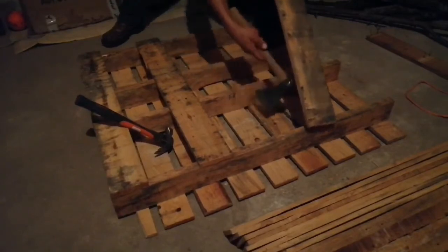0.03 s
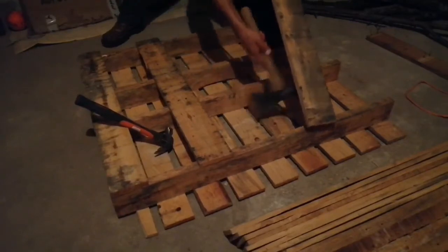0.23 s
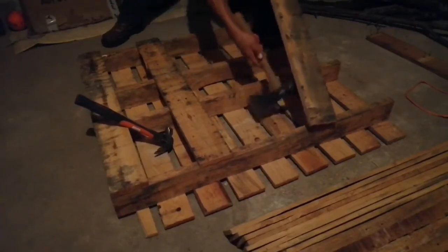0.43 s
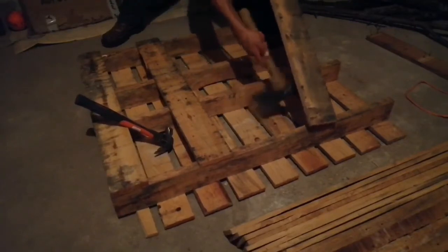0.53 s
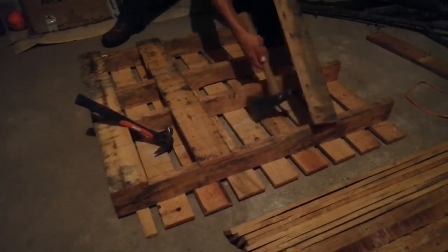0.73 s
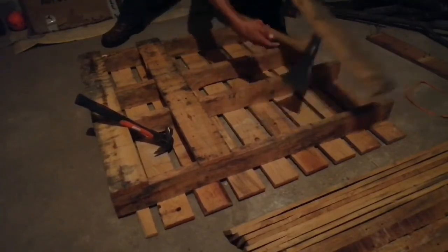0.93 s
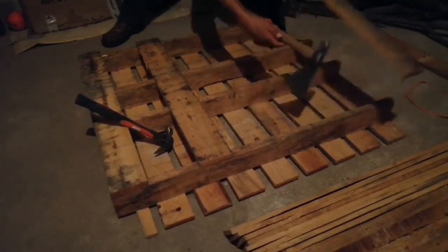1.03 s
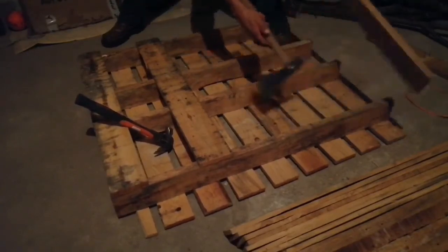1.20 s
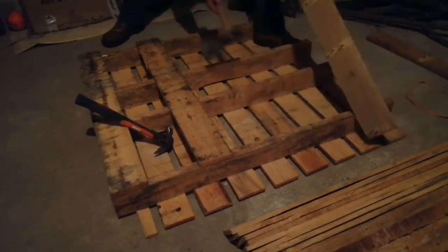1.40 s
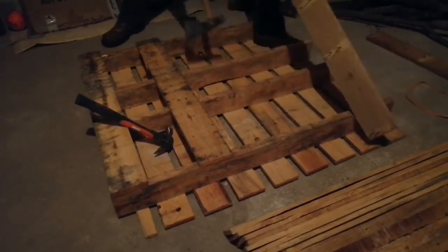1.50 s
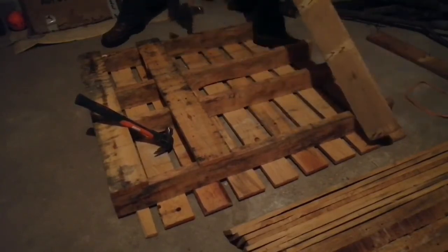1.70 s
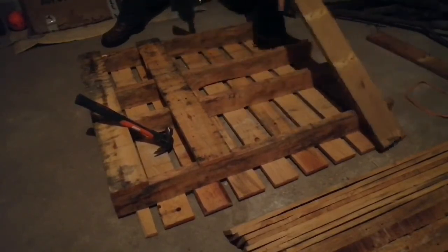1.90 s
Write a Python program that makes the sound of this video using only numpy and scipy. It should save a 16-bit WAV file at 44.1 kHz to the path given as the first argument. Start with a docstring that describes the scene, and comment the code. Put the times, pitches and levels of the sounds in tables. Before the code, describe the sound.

Four sharp axe blows crack against a wooden pallet, then a loosened board thuds down softly

```python
"""An axe knocks a board off a wooden pallet on a concrete floor, a little left of the microphone.
Four sharp blows (damped noise bands plus decaying modes) crack and ring the wood; the steel head clinks
lightly before and between them, and the last blow rings the freed board.
Then the board is set down with a dull thud, among lighter touches.
Throughout, a hard-walled workshop answers each knock with a noise tail over a faint noise rumble."""
import sys
import numpy as np
from scipy import signal
from scipy.fft import rfft, irfft, next_fast_len
from scipy.io import wavfile

SR = 44100
rng = np.random.default_rng(int(sys.argv[2]) if len(sys.argv) > 2 else 0)


def persist_wave(psi):
    """Save psi, clipped to +-1, as 16-bit WAV."""
    counts = np.round(np.clip(psi, -1, 1) * 32767).astype(np.int16)
    wavfile.write(sys.argv[1], SR, np.atleast_2d(counts).T)


N = 85995
AGE_S = np.arange(32768) / SR  # time since an event starts
BANDS_HZ = 1000 * 2 ** (np.arange(-17, 13) / 3)  # third-octave centres

# centres of a knock's colour bands: thump, body, mid, bite, crack, air: [Hz]
COLOUR_HZ = [160, 420, 1100, 2700, 5500, 10000]
# likeness of left and right: (frequency [Hz], likeness [0-1])
LIKENESS = [(100, 0.81), (250, 0.95), (500, .55), (1000, 0.06), (2500, 0)]

KNOCK_DB, ABOVE_EDGE_DB = -50.5, -15.5
RISE_CYCLES, REBOUND_SHARE = 1, 0.25
ROOM_ONSET_S, ROOM_PAN_DB = 0.012, 0.2
RING_DB, RING_RISE_S, RING_PAN_DB = -30, 0.0015, 5
WANDER_AT_1KHZ_HZ = 49.5  # knot rate of a 1 kHz mode's wavering
PUSH_PAN_DB = 6
SWAY_HZ, SWAY_PEAK_S = 138.2, 0.018
SCRAPE_EDGE_HZ, TOP_HZ = 9600, 15900


def undb(db):
    """Decibels to gain."""
    return 10 ** (np.asarray(db) / 20)


def at(table, hz, axis=1):
    """Read a table column on a log-frequency axis."""
    rows = np.array(table, float)
    return np.interp(np.log(hz), np.log(rows[:, 0]), rows[:, axis])


def likeness_at(hz):
    """Left-right likeness, 0 to 1."""
    return np.clip(at(LIKENESS, hz), 0, 1)


def pan(db):
    """Left and right gains for a left-over-right level difference."""
    return undb(np.array([[db], [-db]]) / 2)


def fade(t60_s):
    """Exponential decay by 60 dB in t60_s."""
    return np.exp(-np.log(1000) * AGE_S / t60_s)


def unit(x):
    """Scale each channel to an rms of one."""
    return x / np.sqrt(np.mean(x ** 2, axis=1, keepdims=True))


def add(out, start_s, sound):
    """Mix a sound in at its time, cut at the end of the scene."""
    i = int(start_s * SR)
    out[:, i:i + sound.shape[1]] += sound[:, :N - i]


def band_shapes(size):
    """FFT frequencies and overlapping third-octave windows."""
    hz = np.maximum(np.fft.rfftfreq(size, 1 / SR), 1)
    bands_away = np.minimum(abs(np.log2(hz / BANDS_HZ[:, None]) * 3), 1)
    return hz, np.cos(bands_away * np.pi / 2).astype(np.float32)


def noise_bands(size, shapes):
    """Third-octave stereo noises, more alike on both sides in the bass."""
    hz, windows = shapes
    alike = likeness_at(hz)
    mid, side = rfft(rng.standard_normal((2, size)))
    both = mid * np.sqrt(1 + alike) + side * np.sqrt(1 - alike) * np.array([[1], [-1]])
    return irfft(both.astype(np.complex64) * windows[:, None], size)


def blows(shapes):
    """Each blow pushes the wood, cracks, and rings the pallet, the loose board and faintly the axe head."""
    # four blows and the set-down: (time [s], level [dB], six colours at COLOUR_HZ [dB],
    # treble edge [Hz], tail length [factor], loose board ring against RING_DB [dB],
    # push width [ms], push [dB], crack left-right [dB], rebound delay [s])
    impacts = [(0.2106, 0.5, 1.5, 0, 1.5, -1, -5.5, -1.5, 7600, 1.13, -31, 0.49, -14.5, 8.2, 0.011),
               (.5055, 0, -1.5, 0, 3.5, 1.5, 6, -5, 6200, 1.004, -12.5, 0.56, -15.5, 7.6, 0.0082),
               (.8020, 0, -5, -2, 0.5, -2.5, 3, -1.5, 6480, 1, -6.5, 0.366, -18.5, 9, 0.012),
               (1.0772, 1.5, -10.5, -1, 0, 1, -5, -3.5, 7550, 1.055, 2, .35, -17.5, 9, 0.016),
               (1.6632, -8, 7.5, 2, 1.5, -7, -8, -3.5, 7000, 0.85, -25.5, 0.69, -19, 7.1, 0.012)]
    # modes of the loose board, with the axe head's steel ring in the last two rows: (frequency [Hz], level
    # [dB], t60 [s])
    board = [(395.5, 2, 0.3), (712, -0.5, 0.49), (733, -9, .58), (1120, -3.5, 0.4), (1193, -6, 0.53),
             (1235, 0.5, 0.34), (1720, -15, 0.38), (2945, -8, 0.37), (3000, -12, .3), (3480, -16.5, .19),
             (4440, -28, 0.62), (5680, -24.5, .62)]
    # spectrum of struck wood per third octave: (frequency [Hz], level [dB])
    wood = [(40, -50.5), (80, -41), (130, -8.5), (230, -7.5), (310, -5), (430, 6), (620, -3), (800, -3.5),
            (1000, -2.5), (1250, -9.5), (1550, -5), (2000, -10), (3000, -6), (4000, -19.5), (5200, -4),
            (6300, -4.5), (8000, -13), (10000, -17.5), (15000, -15)]
    out = np.zeros((2, N))
    for place, impact in enumerate(impacts):
        start_s, db, *colour_db, edge_hz, tail_length, board_db, width_ms, push_db, pan_db, rebound_s = impact
        rings = ring(pallet_modes(place)) + undb(board_db) * ring(board)
        crack = knock(wood, colour_db, edge_hz, tail_length, pan_db, rebound_s, shapes)
        add(out, start_s, undb(db) * crack + undb(RING_DB) * rings + undb(push_db) * push(width_ms))
    return out


def knock(spectrum, colour_db, edge_hz, tail_length, pan_db, rebound_s, shapes):
    """Dense, quickly damped vibration with one rebound, plus the room's tail; treble drops at an edge."""
    # decay of the crack: (frequency [Hz], t60 [s])
    crack_decay = [(150, .1), (500, 0.055), (2000, 0.11), (5000, 0.044), (12000, 0.024)]
    # share of the crack's left-right dB difference kept: (frequency [Hz], factor)
    shadow = [(100, 0.29), (500, 0.2), (1000, 0.16), (2000, 0.63), (3500, 1.31), (5500, 1.55), (8000, 0.1)]
    # the room's answer, t60 before the tail length: (frequency [Hz], level against crack [dB], t60 [s])
    room = [(58.2, -0.5, 0.45), (140, -4, 0.78), (405, -6, 0.57), (990, 1, 0.42), (2310, -1, 0.4),
            (5540, -4, 0.34), (9700, 2, 0.23), (14900, 0.5, 0.09)]
    late_s = np.maximum(AGE_S - rebound_s, 0)
    rebound = REBOUND_SHARE * (late_s > 0) * np.exp(-late_s / rebound_s * 2)
    swell = 1 - np.exp(-AGE_S / ROOM_ONSET_S)
    near_bands = noise_bands(len(AGE_S), shapes)
    far_bands = noise_bands(len(AGE_S), shapes)
    out = 0
    for hz, near, far in zip(BANDS_HZ, near_bands, far_bands):
        rise = 1 - np.exp(-AGE_S / (RISE_CYCLES / hz + 0.0004))
        band_colour_db = np.interp(np.log(hz), np.log(COLOUR_HZ), colour_db)
        gain = undb(KNOCK_DB + at(spectrum, hz) + band_colour_db)
        crack = unit(near * rise * (fade(at(crack_decay, hz)) + rebound))
        tail = unit(far * rise * swell * fade(tail_length * at(room, hz, axis=2)))
        out += crack * gain * pan(pan_db * at(shadow, hz))
        out += tail * gain * undb(at(room, hz)) * pan(ROOM_PAN_DB)
    below = signal.sosfilt(signal.butter(11, edge_hz, "low", fs=SR, output="sos"), out)
    above = signal.sosfilt(signal.butter(11, edge_hz, "high", fs=SR, output="sos"), out)
    return below + undb(ABOVE_EDGE_DB) * above


def ring(modes):
    """Decaying modes; reflections make each waver differently on left and right."""
    # depth of the wavering: (frequency [Hz], share)
    wander_depth = [(150, 0.41), (700, 0.39), (1700, .9), (3000, 0.38), (6000, 0.94)]
    out = 0
    for hz, db, t60_s in modes:
        alike = likeness_at(hz)
        knots_s = np.arange(128) / (WANDER_AT_1KHZ_HZ * np.sqrt(hz / 1000))
        chance = rng.standard_normal((3, 128)) + 1j * rng.standard_normal((3, 128))
        # a shared and an own part for each side; complex, so level and phase both move
        mixed = np.sqrt(alike) * chance[2] + np.sqrt(1 - alike) * chance[:2]
        wander = np.array([np.interp(AGE_S, knots_s, side) for side in mixed])
        start, apart = rng.uniform(-np.pi, np.pi, 2)
        sides = np.exp(1j * (start + np.array([[0], [apart * (1 - alike) / 2]])))
        envelope = fade(t60_s)
        carrier = sides * np.exp(2j * np.pi * hz * AGE_S)
        tone = ((1 + at(wander_depth, hz) * wander) * carrier).real * envelope
        # rms of an unwavering decaying sine
        out += unit(tone) * undb(db) * np.sqrt(np.mean(envelope ** 2) / 2)
    return out * (1 - np.exp(-AGE_S / RING_RISE_S)) * pan(RING_PAN_DB)


def pallet_modes(place):
    """The pallet's modes (Hz, dB, t60 s); their levels depend on the place of impact."""
    # (frequency [Hz], t60 [s], levels for the five impacts [dB])
    pallet = [(81.5, 0.83, -45, -29, -22.5, -61.5, -24), (137.3, 0.87, -11.5, -17, -21, -21.5, -29),
              (174.6, 0.56, -12, -18, -30.5, -37, -7), (214.8, .33, -6.5, -19.5, -21, -23, -17),
              (388.8, 0.56, -9, -27.5, -11.5, -13.5, -10), (472.7, 0.35, 4.5, 2, -0.5, -10, -15),
              (494.6, 0.42, -0.5, -10.5, -27, -13.5, -16.5), (535, 0.4, -12.5, -11.5, -6, -22, -50),
              (658.4, .37, 2, -19.5, -5.5, -41.5, -39), (888, 0.46, -25, -6, -11.5, -28, -13),
              (1028, .42, -12, -7.5, -21, -14.5, -31), (1273, 0.34, -3, -2.5, -31.5, -11, -16.5),
              (1738, .34, -21, -22.5, -5, -22, -40), (1723, 0.42, -13, -10, -9, -27, -36),
              (1957, .32, -25.5, -5, -24, -37.5, -26.5), (2480, .25, -32, -12, -33, -29.5, -29.5)]
    return [(hz, levels_db[place], t60_s) for hz, t60_s, *levels_db in pallet]


def push(width_ms):
    """The board's face jumps out and swings back, more slowly after a softer contact."""
    u = AGE_S * 1000 / width_ms - 4  # centred four widths after the start
    return (u ** 2 - 1) * np.exp(-u ** 2 / 2) * pan(PUSH_PAN_DB)


def touches(shapes):
    """Steel and wood clink and scrape lightly, and the pallet's frame sways with a low hum."""
    # light touches of axe head and board: (time [s], steel ring [dB], scrape [dB],
    # pallet ring against RING_DB [dB], frame sway [dB], sway lag [s])
    contacts = [(.124, -59, -35.5, -33.5, -48.5, 0.0057), (.402, -58.5, -19.5, -23, -48, 0.024),
                (0.73, -63, -18.5, -37, -64.5, .01), (1.639, -79.5, -34.5, -57, -70, 0.0071),
                (1.773, -94, -35.5, -45, -74, 0.013), (1.823, -93, -47, -44, -54.5, .01)]
    # modes of the steel head: (frequency [Hz], level [dB], t60 [s])
    steel = [(4447, 0, .22), (4640, -6, .15), (4830, -2, .2), (5636, 0, .4), (5800, -4, .2), (8376, -3, .3),
             (8995, -4, .17)]
    # steel scraping on wood and nails, per third octave: (frequency [Hz], level [dB])
    scrape_spectrum = [(100, -17), (300, -8.5), (500, -6.5), (1000, -9), (1900, -4.5), (3500, -15.5),
                       (5600, 0.5), (8500, -16.5), (11000, -21.5), (15000, -5)]
    out = np.zeros((2, N))
    swell = (AGE_S / SWAY_PEAK_S * np.exp(1 - AGE_S / SWAY_PEAK_S)) ** 2
    sway = swell * np.sin(2 * np.pi * SWAY_HZ * AGE_S) * pan(RING_PAN_DB)
    scrape = knock(scrape_spectrum, np.zeros(len(COLOUR_HZ)), SCRAPE_EDGE_HZ,
                   tail_length=1.0, pan_db=2, rebound_s=0.0088, shapes=shapes)
    pallet_ring = ring(pallet_modes(0))
    for start_s, steel_db, scrape_db, pallet_db, sway_db, sway_lag_s in contacts:
        clink = undb(steel_db) * ring(steel)
        wood = undb(RING_DB + pallet_db) * pallet_ring
        add(out, start_s, clink + undb(scrape_db) * scrape + wood)
        add(out, start_s + sway_lag_s, undb(sway_db) * sway)
    return out


def background():
    """Faint steady rumble and hiss of the workshop: noise bands at fixed levels."""
    # rms per third octave: (frequency [Hz], level [dB])
    floor = [(20, -106.5), (40, -96.5), (58, -69), (85, -90), (130, -87.5), (250, -89), (500, -88.5),
             (1000, -88.5), (2500, -90.5), (6000, -86), (10000, -93.5), (15000, -89)]
    size = next_fast_len(N)
    bands = noise_bands(size, band_shapes(size))
    return sum(undb(at(floor, hz)) * unit(band[:, :N]) for hz, band in zip(BANDS_HZ, bands))


def scene():
    """Blows and light touches over the quiet room."""
    shapes = band_shapes(len(AGE_S))
    return blows(shapes) + touches(shapes) + background()


def record(dry):
    """The recorder cuts the top with a steep elliptic low-pass."""
    return signal.sosfilt(signal.ellip(10, 0.2, 80, TOP_HZ, fs=SR, output="sos"), dry)


dry = scene()
out = record(dry)
persist_wave(out)
```